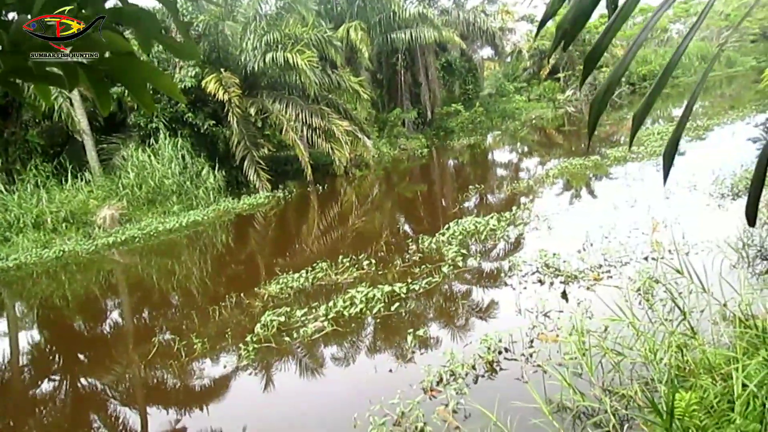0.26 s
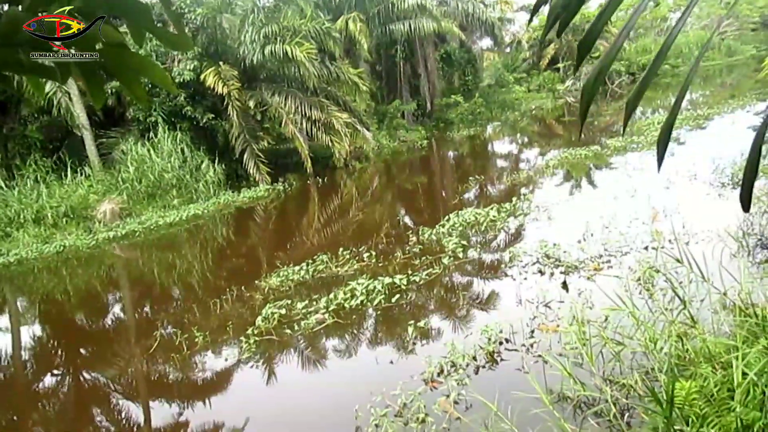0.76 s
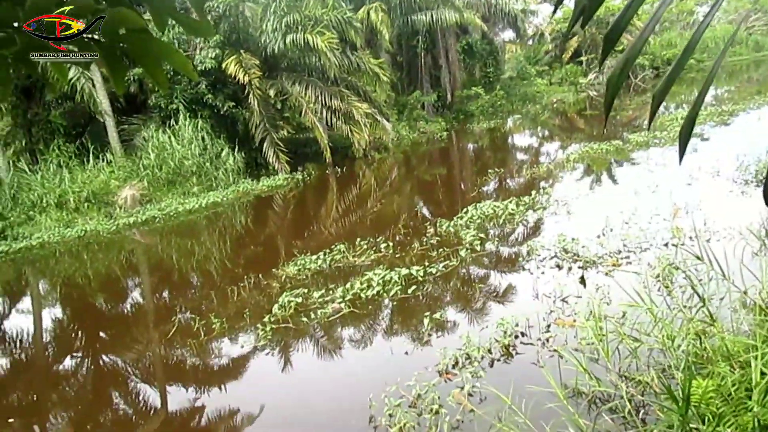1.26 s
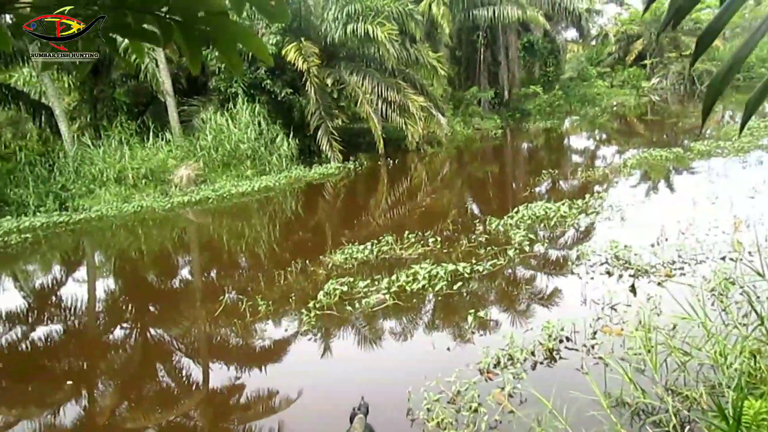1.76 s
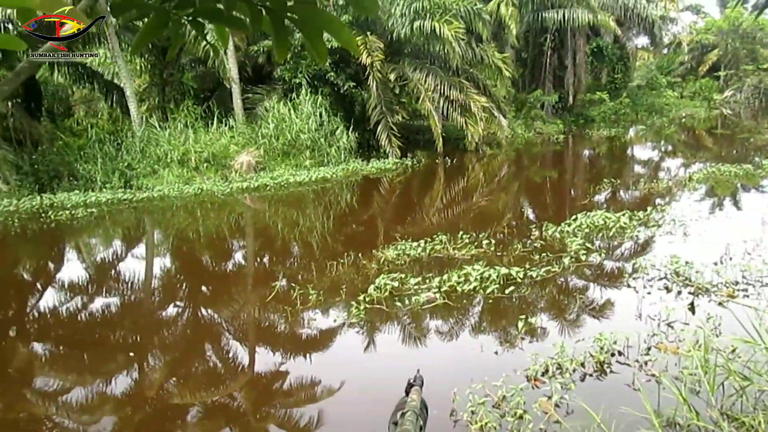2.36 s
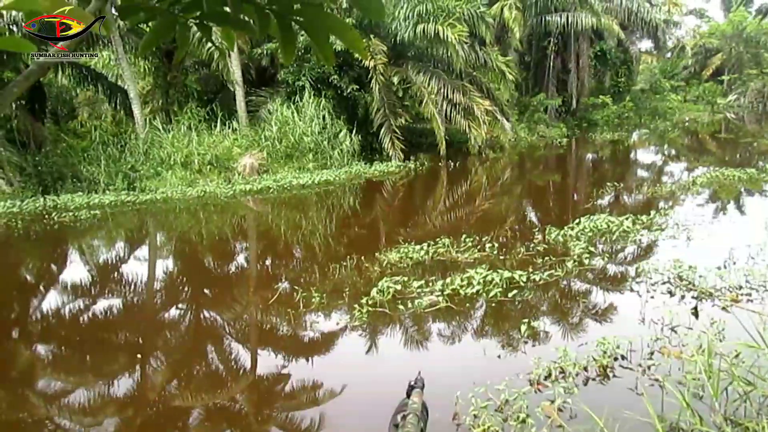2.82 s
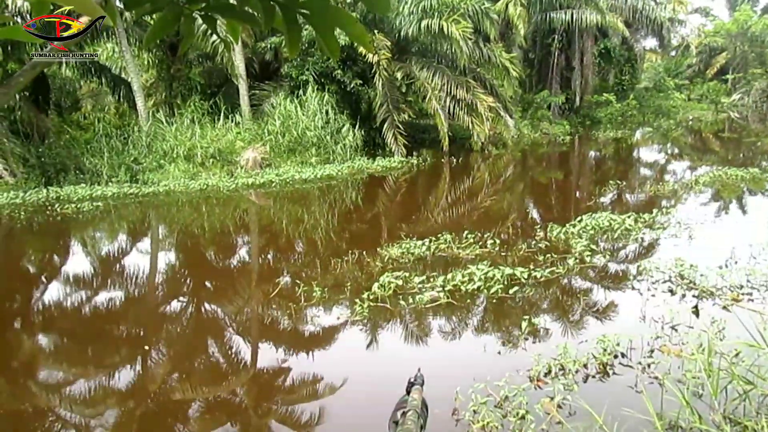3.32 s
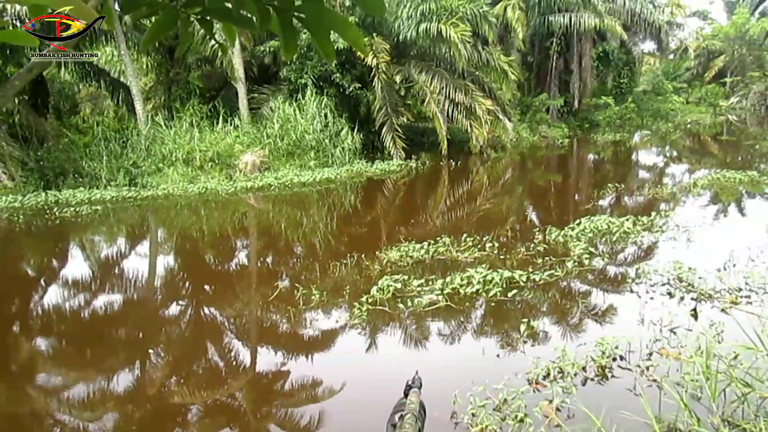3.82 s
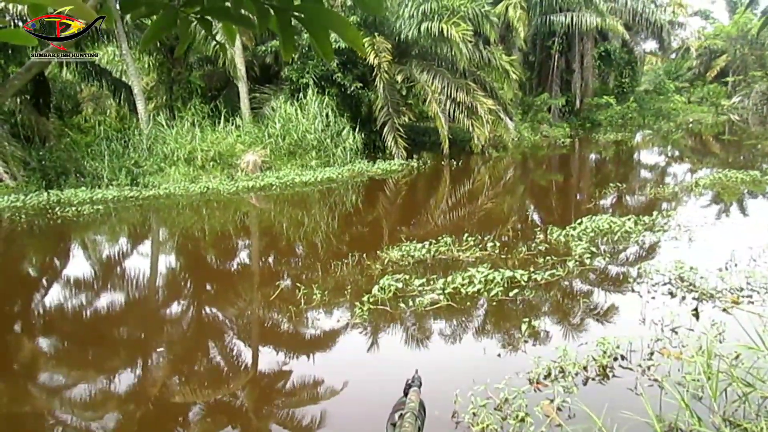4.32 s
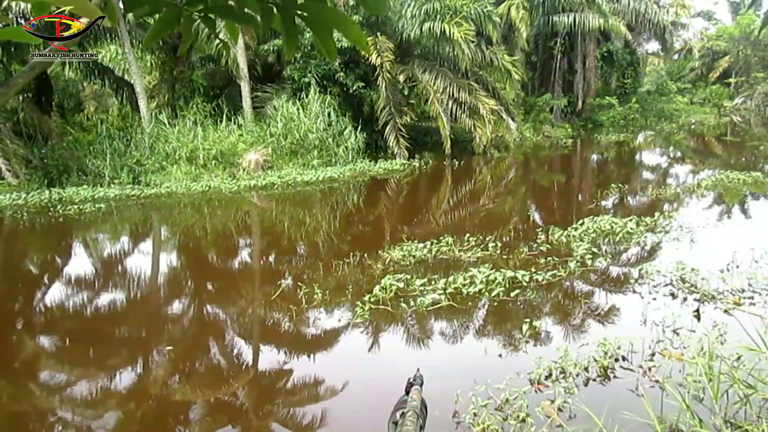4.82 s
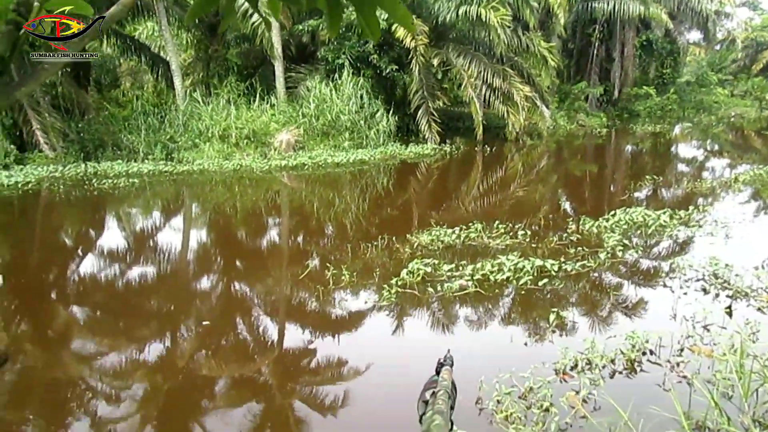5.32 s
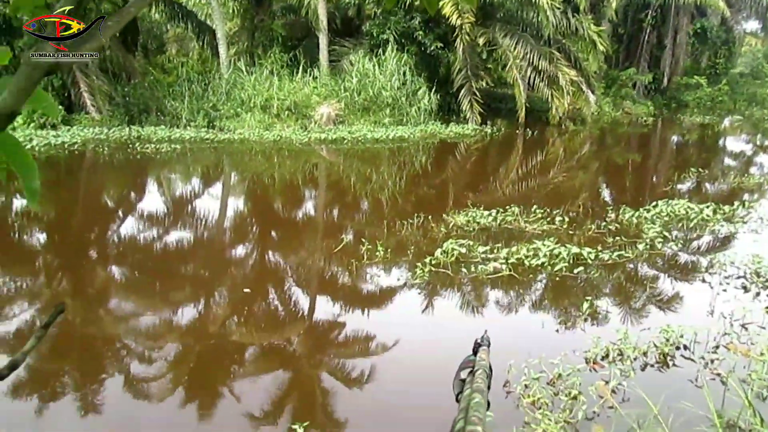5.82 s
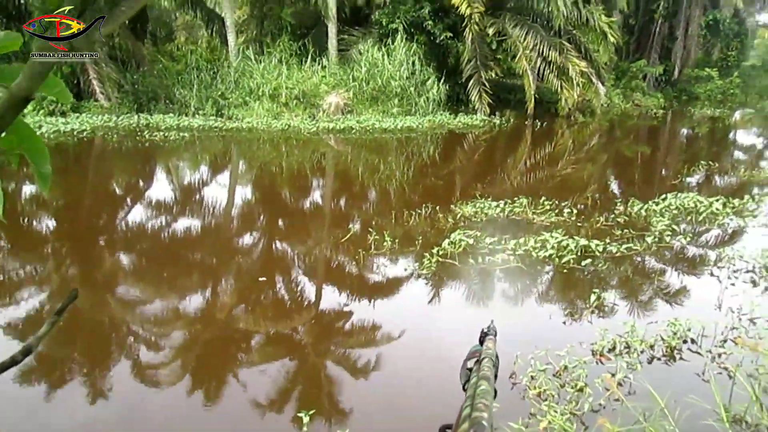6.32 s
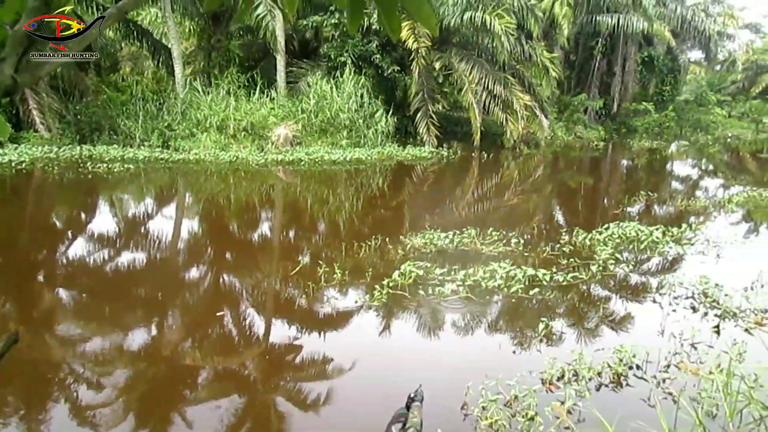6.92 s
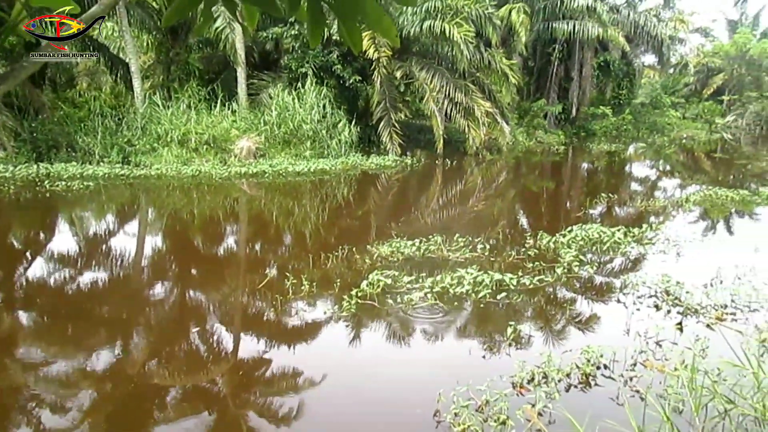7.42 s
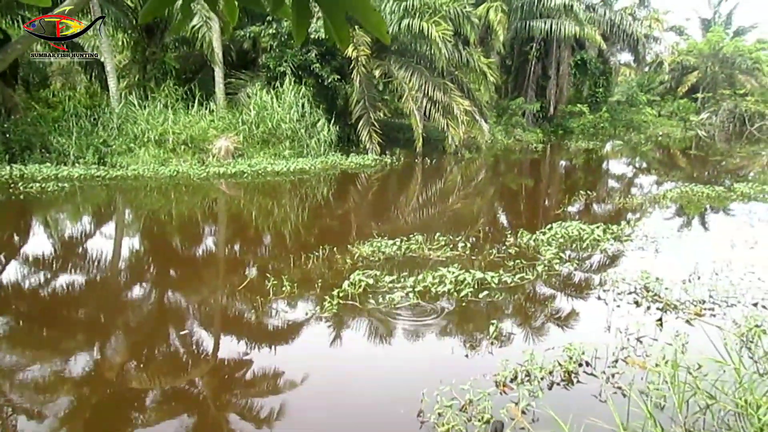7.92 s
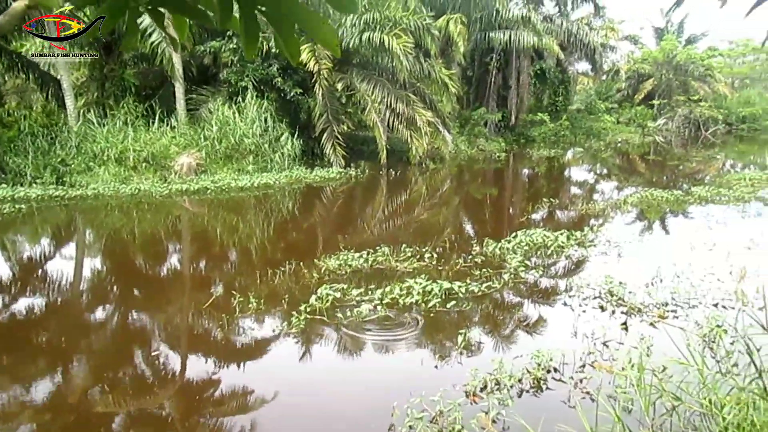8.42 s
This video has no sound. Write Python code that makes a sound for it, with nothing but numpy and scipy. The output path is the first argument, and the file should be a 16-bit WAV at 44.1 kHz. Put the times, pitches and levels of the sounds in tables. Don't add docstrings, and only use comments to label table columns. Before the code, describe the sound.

Outdoors by a still, tree-lined river, crickets throb at high pitch over katydid hiss, soft air murmur and a far motor drone. Small knocks on a rifle stock come early, birds whistle and chatter midway, then a loud dry air rifle snap cracks near the microphone, with a puff and quick echo. The background drops suddenly and slowly recovers while birds babble on.

```python
import sys
import numpy as np
from scipy import signal
from scipy.fft import rfft, irfft, next_fast_len
from scipy.io import wavfile
from scipy.ndimage import uniform_filter1d

SR = 44100
rng = np.random.default_rng(int(sys.argv[2]) if len(sys.argv) > 2 else 0)


def gain_from_db(level_db):
    decades = np.asarray(level_db, float) / 20
    return 10 ** decades


def inscribe(sig):
    pcm = np.round(np.clip(np.atleast_2d(sig).T, -1, 1) * 32767)
    wavfile.write(sys.argv[1], SR, pcm.astype(np.int16))


N = 382347
T = np.arange(N) / SR


def in_time(rows):
    s, *columns = np.transpose(rows)
    return [np.interp(T, s, column) for column in columns]


def rms_one(x):
    return x / np.sqrt(np.mean(x ** 2) + 1e-20)


def coloured(x, spectrum):
    hz, db = np.transpose(spectrum)
    size = next_fast_len(N)
    log_hz = np.log(np.arange(size // 2 + 1) * SR / size + 1)
    gain = gain_from_db(np.interp(log_hz, np.log(hz), db, left=-60, right=-90))
    return rms_one(irfft(rfft(x, size) * gain, size)[:N])


def drift(rate):
    knots = rng.standard_normal(int(N / SR * 40) + 9)
    return np.interp(T * np.clip(rate, .1, 39), np.arange(len(knots)), knots)


def flutter(hz):
    lowpass = signal.butter(2, hz, fs=SR, output="sos")
    return rms_one(signal.sosfilt(lowpass, rng.standard_normal(N)))


def resonate(x, peaks):
    out = 0
    for k, (hz, width_hz, db) in enumerate(peaks):
        b, a = signal.iirpeak(hz, hz / width_hz / 1.6, SR)
        ringing = signal.lfilter(b, a, signal.lfilter(b, a, x))
        out = out + (-1) ** k * gain_from_db(db) * ringing
    return rms_one(out)


def trees(x, t60, wet_db):
    t = T[:SR // 2]
    tail = rng.standard_normal(len(t)) * gain_from_db(-60 * t / t60) * (t > .006)
    wet = signal.fftconvolve(x, tail / np.sqrt(np.sum(tail ** 2)))[:N]
    stirred = np.interp(T + .00009 * flutter(25), T, wet)
    return x + gain_from_db(wet_db) * stirred


def air():
    # (frequency [Hz], density [dB per Hz])
    air_spectrum = [(25, -10.5), (60, 0), (100, -3), (200, -12), (500, -16), (1000, -21), (2000, -29),
                    (3500, -40.5), (5000, -44.5), (7000, -51), (9000, -42.5), (11000, -56), (13500, -63.5),
                    (16000, -65)]
    # (time [s], half length
    # [s], rise [dB])
    gusts = [(0.0, .2, 0.5), (.78, 0.47, 0.5), (1.917, 0.15, 2.5), (2.455, 0.26, 2), (4.25, 0.57, 1),
             (4.975, .25, 0.5), (5.554, 0.59, 4)]
    gust_db = sum(db * np.clip(1 - np.abs(T - s) / half, 0, 1) for s, half, db in gusts)
    noise = coloured(rng.standard_normal(N), air_spectrum)
    hiss = signal.sosfilt(signal.butter(2, 3000, "high", fs=SR, output="sos"), noise)
    murmur = gain_from_db(-41.5 + 0.21 * gust_db + 0.39 * drift(4.6)) * (noise - hiss)
    leaves = gain_from_db(-36.5 + gust_db + 1.2 * drift(1.9)) * hiss
    return murmur + leaves


def engine():
    # (time [s], firing rate [Hz], tone level [dB], drone level [dB])
    motor = [(0, 79.5, -40.5, -50.5), (1, 82.72, -43.5, -48.5), (2.5, 89.3, -42, -50.5),
             (3.2, 92.3, -41.5, -81), (3.4, 78.8, -47, -55), (5, 81, -40.5, -66), (5.6, 82.4, -86, -48),
             (5.9, 109.9, -40.5, -56), (6.5, 104.3, -47, -60.5), (8.67, 102.7, -46.5, -52.5)]
    firing_hz, tone_db, drone_db = in_time(motor)
    tone = np.sin(2 * np.pi * np.cumsum(firing_hz + 1.5 * drift(8)) / SR)
    drone = np.sin(2 * np.pi * np.cumsum(155 + 1.42 * drift(4)) / SR)
    return gain_from_db(tone_db - 0.5 + 1.3 * drift(5.9)) * tone + gain_from_db(drone_db + 1.5 + 2.1 * drift(6.8)) * drone


def katydids():
    # (frequency [Hz], density [dB per Hz])
    chorus = [(8700, -21), (9000, -4), (9500, 5), (10180, 2.5), (10300, -7), (10800, -33), (11500, -27)]
    grains = rng.standard_normal(N) * (rng.random(N) < 6000 / SR)
    return gain_from_db(-65.5 + .9 * drift(1.2)) * coloured(grains, chorus)


def leading():
    # (first throb [s], throb rate [per s], throb depth [0-1])
    leaders = [(.002, 16.83, .4), (1.788, 17.9, .24), (4.268, 16.97, .26), (5.014, 17.4, .2),
               (6.538, 16.83, .27), (8.25, 19, .35)]
    start, rate, depth = np.transpose(leaders)
    who = np.clip(np.searchsorted(start, T) - 1, 0, None)
    since = T - start[who]
    left = np.append(start[1:], np.inf)[who] - T
    return since * rate[who], depth[who] * np.clip(np.minimum(since, left) / .3, .3, 1)


def crickets():
    # (frequency [Hz], width [Hz], level [dB])
    wings = [(7395, 150, -5), (7715, 80, 0), (7915, 50, -3), (8100, 90, -4), (8195, 70, 0), (8360, 50, 1),
             (8530, 100, -9)]
    evenness = .6
    count, depth = leading()
    strikes = rng.standard_normal(N) * (rng.random(N) < 6000 / SR)
    throb = 1 + 1.15 * depth * np.cos(2 * np.pi * count) + .09 * np.cos(4 * np.pi * count)
    far = gain_from_db(-14) * resonate(strikes, wings[:2])
    near = resonate(strikes, wings[2:])
    near = rms_one(near / (uniform_filter1d(np.abs(near), size=350) + .1) ** evenness)
    return gain_from_db(-59 + 1.0 * drift(1.7)) * (far + np.clip(throb, .1, 3) * near)


def trills():
    # (time [s], length [s], level [dB])
    trill_events = [(0, 0.2, -62.5), (0.317, .06, -77), (.58, 0.11, -71), (0.68, .27, -64.5),
                    (1.082, 0.091, -69), (1.498, 0.26, -63), (2.405, 0.44, -66.5), (2.879, 0.12, -67),
                    (3.348, 0.23, -64), (4.203, 0.25, -65), (4.953, 0.24, -65), (5.853, 0.24, -66.5),
                    (7.114, 0.25, -67), (7.884, 0.24, -65), (8.59, 0.21, -68)]
    # (frequency [Hz], width [Hz], level [dB])
    trill_wings = [(4560, 200, -3), (4800, 170, 0), (5020, 170, -1)]
    drive, progress = np.zeros((2, N))
    for s, length, db in trill_events:
        t = T - s
        part = np.clip(t / length, 0, 1)
        in_group = t % .0408
        strokes = (in_group < .036) * (.3 + np.sin(np.pi * in_group / .012) ** 2)
        drive += gain_from_db(db) * np.sin(np.pi * part) ** .5 * strokes
        progress += part * (part < 1)
    low = resonate(rng.standard_normal(N), trill_wings[:2])
    high = resonate(rng.standard_normal(N), trill_wings[1:])
    voice = low * np.cos(1.5 * progress) + high * np.sin(1.5 * progress)
    return trees(1.16 * drive * voice, .3, -5.5)


def flock():
    start_s, low_hz, high_hz = 5.0, 1600, 2450
    s, pitch, slope, size = rng.random((55, 4)).T
    hz = low_hz + pitch * (high_hz - low_hz)
    end_hz = hz * (.75 + .2 * slope)
    glide_s = size * 0 + .034
    return list(zip(start_s + s * (8.6 - start_s), .018 + .02 * size, hz, end_hz, -65 + 5 * size, glide_s))


def notes():
    # (time [s], length [s], start [Hz], end [Hz], level [dB])
    whistles = [
        (.556, .012, 2990, 1870, -51.5),
        (3.342, .03, 3850, 3330, -66),
        (4.786, 0.16, 2820, 2260, -57),
        (5.019, 0.172, 2500, 3500, -55.5),
    ]
    # (time [s], length [s], start [Hz], level [dB])
    pipes = [(3.365, 0.216, 3297, -71), (5.79, 0.08, 3197, -68), (6.105, .07, 3314, -74),
             (6.83, 0.272, 3120, -70), (7.915, .17, 3140, -74)]
    # (time [s], level [dB])
    tseeps = [(3.141, -62), (5.445, -63), (6.1, -59), (6.9, -66), (7.602, -61), (8.14, -63)]
    # (time [s], level [dB])
    twits = [(3.186, -63), (3.768, -63), (4.911, -66), (5.49, -61.5), (6.68, -61), (7.66, -60), (8.26, -72)]
    # (time [s], length [s], start [Hz], level [dB])
    falls = [(5.032, 0.042, 2365, -54), (5.1, .04, 1790, -55), (5.193, 0.043, 2455, -56),
             (5.501, 0.1, 2440, -63), (5.943, 0.041, 2370, -58), (6.601, 0.068, 2340, -54.5),
             (6.79, 0.044, 1850, -54.5), (6.899, .038, 2660, -52.5), (6.997, 0.064, 1994, -52.5),
             (7.207, 0.0251, 1950, -52), (7.354, 0.072, 2004, -53.5), (7.555, 0.12, 2510, -55),
             (7.896, 0.062, 2706, -59), (7.989, 0.052, 1830, -58)]
    # (time [s], length [s], start [Hz], level [dB])
    slurs = [(5.446, 0.033, 2410, -59.5), (6.038, 0.025, 1870, -51), (6.472, 0.066, 2570, -50),
             (8.166, 0.0382, 1500, -59), (8.443, .095, 2476, -57)]
    # (time [s], length [s], start [Hz], level [dB])
    pips = [(4.056, .04, 2350, -66), (4.585, .022, 2320, -62), (4.921, 0.034, 1695, -56),
            (6.203, .05, 1720, -50), (6.924, 0.034, 1984, -55), (7.24, 0.028, 2310, -53),
            (7.54, .022, 1760, -48), (7.79, 0.096, 1903, -59.5)]
    # (time [s], length [s], start [Hz], level [dB])
    rises = [(5.39, .037, 1564, -55.5), (5.637, 0.035, 2000, -54), (5.858, 0.031, 1533, -56.5),
             (7.006, .036, 2300, -60.5), (8.204, 0.025, 1405, -61), (8.27, 0.045, 1375, -52.5),
             (8.567, 0.058, 1720, -56)]
    glide_s = .034
    rows = [row + (.065,) for row in whistles]
    rows += [(s, length, hz, hz * .975, db, length) for s, length, hz, db in pipes]
    rows += [(s, .022, 4650, 4050, db, glide_s) for s, db in tseeps]
    rows += [(s, .04, 3300, 3850, db, 0.0138) for s, db in twits]
    for kind, ratio in ((falls, .83), (slurs, .92), (pips, 1.005), (rises, 1.19)):
        rows += [(s, length, hz, hz * ratio, db, glide_s) for s, length, hz, db in kind]
    return rows + flock()


def whistled_notes():
    sag_share, fade_db, edge_s = .15, 7, .016
    clear, hoarse = np.zeros((2, N + SR))
    for s, length, start_hz, end_hz, db, glide_s in notes():
        u = np.arange(int(length * SR)) / (length * SR)
        glide = np.clip(u * length / min(glide_s, 0.904 * length), 0, 1)
        hz = start_hz + (end_hz - start_hz) * ((1 - sag_share) * glide + sag_share * u)
        edges = np.clip(np.minimum(u, 1 - u) * length / edge_s, 0, 1) ** 0.38
        at = int(s * SR)
        voice = hoarse if end_hz < 2700 and s > 4.9 else clear
        voice[at:at + len(u)] += gain_from_db(db + 9 - fade_db * u) * edges * np.sin(2 * np.pi * np.cumsum(hz) / SR)
    return clear[:N], hoarse[:N]


def chatter():
    # (time [s], level [dB])
    bursts = [(3.725, -52), (3.78, -56), (3.855, -55), (3.94, -54), (3.984, -54), (4.03, -52.5), (4.1, -56),
              (4.215, -48.5), (4.329, -54.5), (4.44, -53), (4.55, -56), (4.68, -54)]
    rise_s, fade_s = 0.0048, 0.045
    top_hz, end_hz, sink_s = 4150, 2700, .45
    since = [np.clip(T - s, 0, None) for s, db in bursts]
    centre_hz = end_hz + (top_hz - end_hz) * np.exp(-since[0] / sink_s)
    effort = 0
    for t, (s, db) in zip(since, bursts):
        effort = effort + gain_from_db(db) * np.minimum(t / rise_s, 1) * np.exp(-t / fade_s)
    out = np.zeros(N)
    for shift_hz in (-330, 0, 250):
        chip = np.cumsum(38 + 7.3 * drift(26)) / SR % 1
        hz = centre_hz + shift_hz + 120 * drift(8.8) + 700 * (chip - .5)
        level = effort * gain_from_db(-2 + 5.5 * drift(14)) * np.sin(np.pi * chip) ** 2
        out += level * np.sin(2 * np.pi * np.cumsum(hz) / SR)
    return out


def birds():
    clear, hoarse = whistled_notes()
    hoarse = hoarse + chatter()
    far = trees(hoarse * (.9 + .4 * flutter(200)), .45, 1) * gain_from_db(-1.5)
    near = trees(clear * (1 + .2 * flutter(120)), .5, 2) * gain_from_db(-2)
    return far + near


def struck(blows, modes, contact_hz):
    # (frequency [Hz], density [dB per Hz])
    blast = [(100, 0), (1200, -0.5), (2200, -5), (3800, -5), (5200, -2), (8300, -2), (11000, -8),
             (14500, -20.5), (16500, -21)]
    rows = np.array(blows)
    at = (rows[:, 0] * SR).astype(int)
    ringing, burst = np.zeros((2, N))
    scatter_db = 2.5 * rng.standard_normal((len(rows), len(modes)))
    for k, (hz, db, t60) in enumerate(modes):
        clicks = np.full(N, 1e-18)
        low_mode_db = rows[:, 2] * (hz < 600)
        clicks[at] = gain_from_db(rows[:, 1] + db + low_mode_db + scatter_db[:, k])
        r, w = gain_from_db(-60 / (t60 * SR)), 2 * np.pi * hz / SR
        ringing += signal.lfilter([0, np.sin(w)], [1, -2 * r * np.cos(w), r * r], clicks)
    for i, (burst_db, t60) in zip(at, rows[:, 3:]):
        t = T[:min(SR // 2, N - i)]
        burst[i:i + len(t)] += gain_from_db(burst_db - 60 * t / t60) * np.minimum(t / .0007, 1)
    ringing = signal.sosfilt(signal.butter(1, contact_hz, fs=SR, output="sos"), ringing)
    return ringing + burst * coloured(rng.standard_normal(N), blast)


def handling():
    # (frequency [Hz], level [dB], t60 [s])
    stock = [(249, -23, 0.026), (540, 0, 0.072), (761, -21, 0.19), (892, -1.5, 0.036), (1090, -9, 0.029),
             (1500, -21, 0.013), (1950, -7.5, 0.0088), (2500, -6.5, 0.011), (3450, -32, 0.011),
             (4580, -7, 0.012), (6300, -34, 0.018)]
    # (time [s], thud [dB], low modes [dB], rattle [dB], rattle t60 [s])
    knocks = [(1.749, -33, -11, -52, .05), (1.752, -30, 10, -49, 0.48), (1.757, -25, -22, -59, 0.12),
              (1.916, -29, -25, -41, 0.17), (1.928, -31.5, -6, -49, 0.23), (1.958, -26, -19, -49.5, 0.77),
              (2.385, -39, -11, -47, 0.34), (2.388, -22.5, -9.5, -54, 0.08), (2.394, -31, -18.5, -66, .1),
              (7.667, -36.5, -8, -58, 0.037)]
    return signal.sosfilt(signal.butter(1, 7000, fs=SR, output="sos"), struck(knocks, stock, contact_hz=2050))


def shot():
    # (frequency [Hz], level [dB], t60 [s])
    barrel = [(201.1, -14, 0.02), (386, -10.5, 0.011), (860, -8, 0.0083), (1217, -3, 0.0095),
              (1401, 2.5, 0.0053), (1720, -8.5, 0.023), (2610, -3, 0.0063), (4970, -19, .01)]
    # (time [s], blow [dB], low modes [dB], air blast [dB], blast t60 [s])
    shot_blows = [(6.2245, -51, -10, -36, 0.01), (6.2295, -27.5, 1, -35.5, 0.015),
                  (6.2312, -5, -0.5, -15, .015), (6.2332, 0, 8, -16.5, 0.013), (6.236, -46, 0, -22.5, 0.2),
                  (6.2505, -20, -8, -1, 0.0068), (6.2522, -38.5, -2, -20, 0.1),
                  (6.262, -18, -6, -30.5, 0.14), (6.291, -30, -3, -25, 0.43), (6.369, -20, 21, -35, 0.11),
                  (6.375, -37, -8, -16.5, 0.11), (6.4145, -26, 0, -26, 0.027),
                  (6.4172, -7.5, -12, -15, 0.027), (6.43, -50, 0, -41.5, 0.89)]
    return trees(struck(shot_blows, barrel, contact_hz=3500), 0.57, -17.0)


def rifle():
    return signal.sosfilt(signal.butter(2, 140, "high", fs=SR, output="sos"), handling() + shot())


def scene():
    return (air() + engine() + katydids() + crickets() + trills() + birds() + rifle())[None]


def ducking():
    grip_s, grip_time_s, rest_db = 6.25, 0.045, 1.0
    since = np.clip(T - grip_s, 0, None)
    quick_db = np.clip(8.05 - 11.6 * since, 0, None)
    slow_db = np.clip(11.55 - 4.35 * since, 0, None)
    return rest_db - (quick_db + slow_db) * np.clip(since / grip_time_s, 0, 1)


def low_pass(x):
    return signal.sosfilt(signal.butter(12, 16650, fs=SR, output="sos"), x)


def record(dry):
    # (frequency [Hz], level [dB])
    whine_tones = [(11793, -80.5), (11823, -92), (11853, -93)]
    # (frequency [Hz], width [Hz])
    whine_notches = [(3942, 130), (7850, 65)]
    whine = sum(gain_from_db(db + 2.0) * np.sin(2 * np.pi * hz * T) for hz, db in whine_tones)
    x = (dry + whine) * gain_from_db(ducking())
    for hz, width_hz in whine_notches:
        x = signal.lfilter(*signal.iirnotch(hz, hz / width_hz, SR), x)
    x = signal.sosfilt(signal.ellip(12, .5, 60, 15450, fs=SR, output="sos"), x)
    return low_pass(np.tanh(x ** 3 * 0.57 + x))


dry = scene()
out = record(dry)
inscribe(out)
```